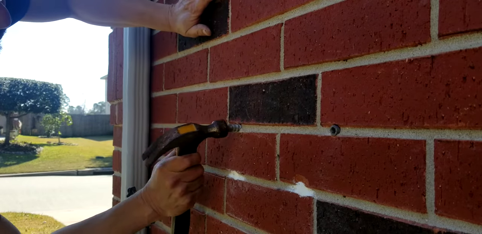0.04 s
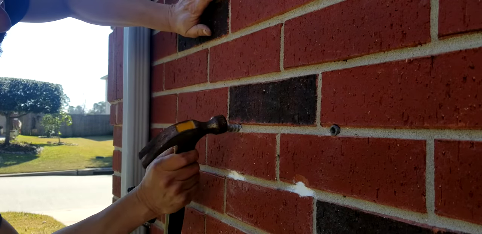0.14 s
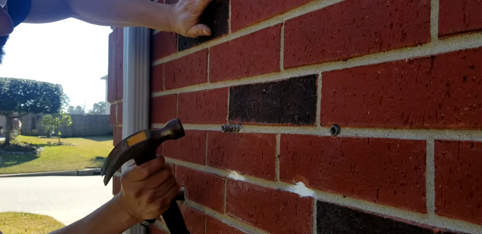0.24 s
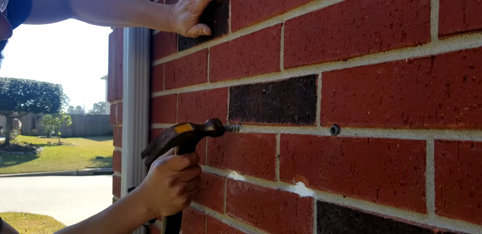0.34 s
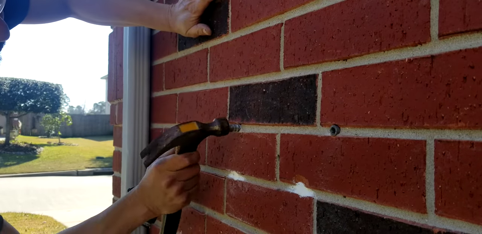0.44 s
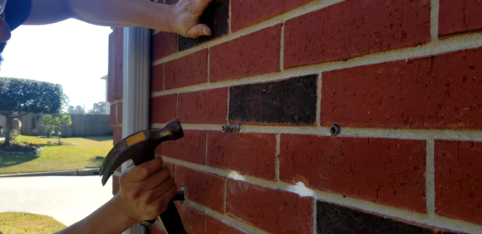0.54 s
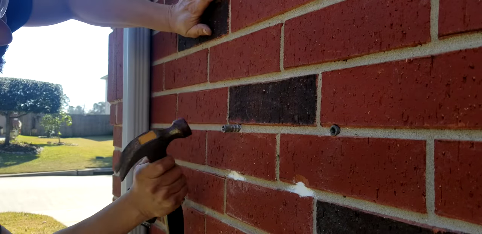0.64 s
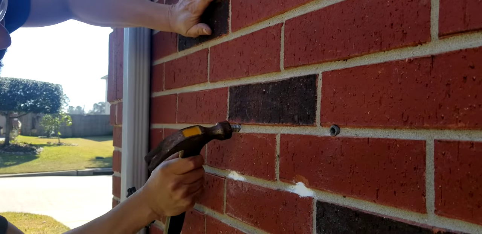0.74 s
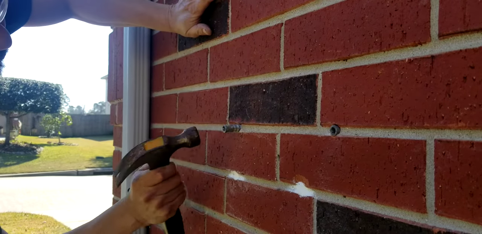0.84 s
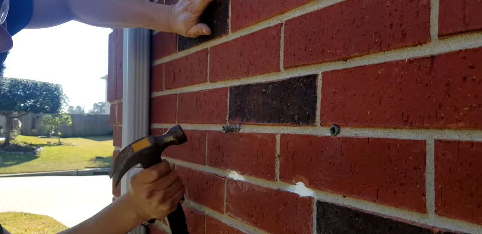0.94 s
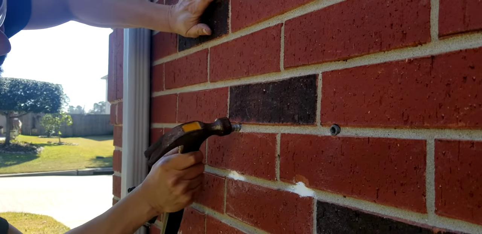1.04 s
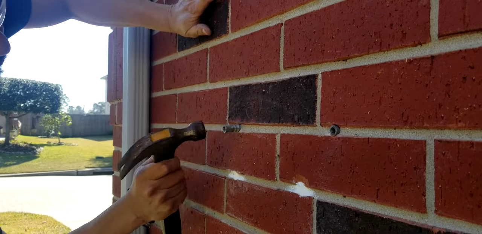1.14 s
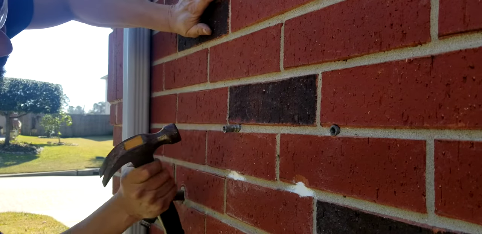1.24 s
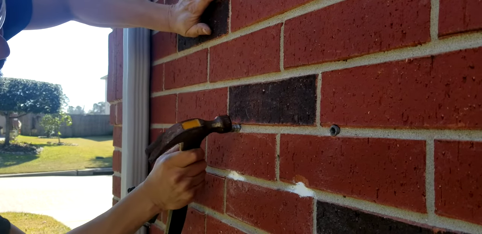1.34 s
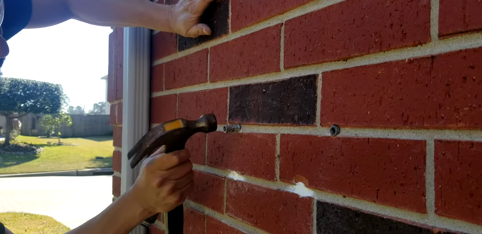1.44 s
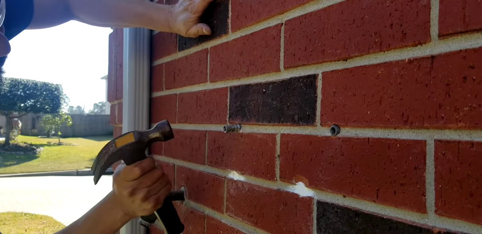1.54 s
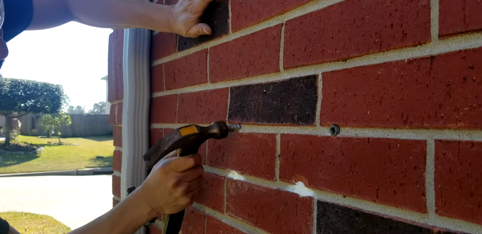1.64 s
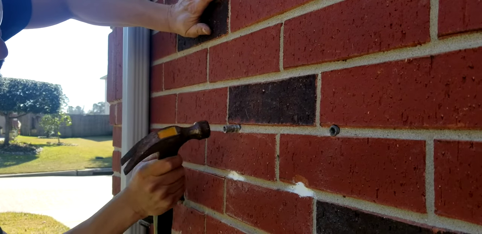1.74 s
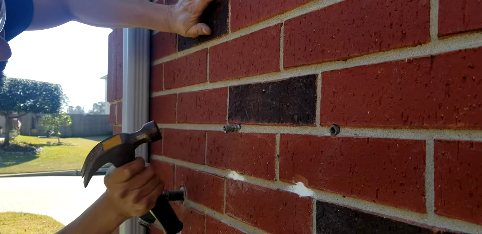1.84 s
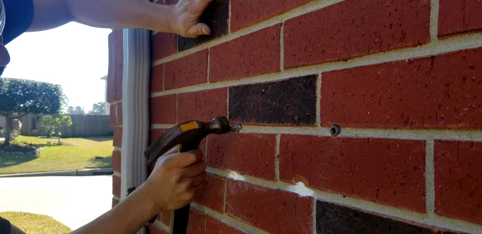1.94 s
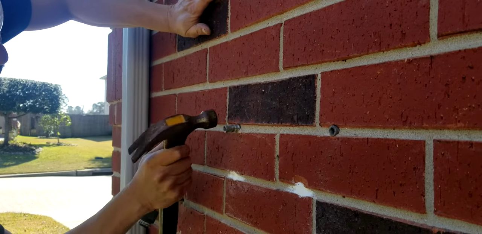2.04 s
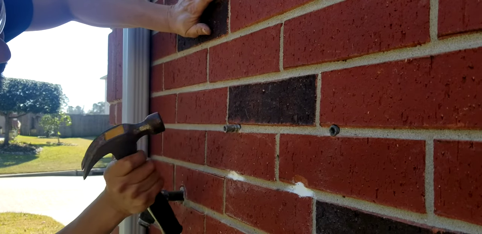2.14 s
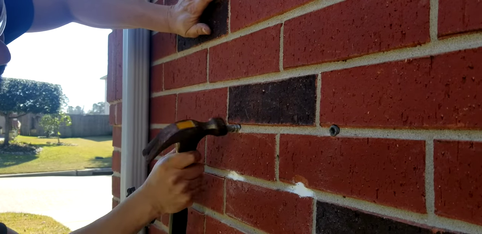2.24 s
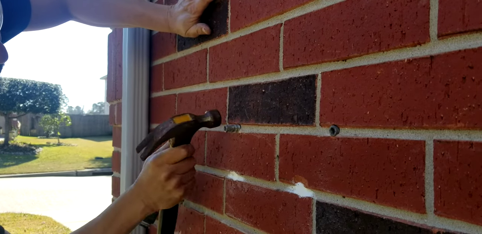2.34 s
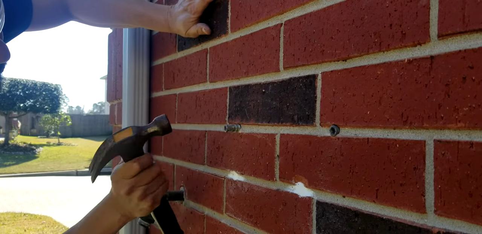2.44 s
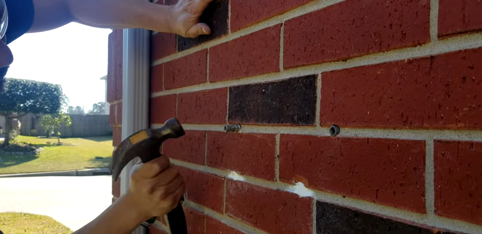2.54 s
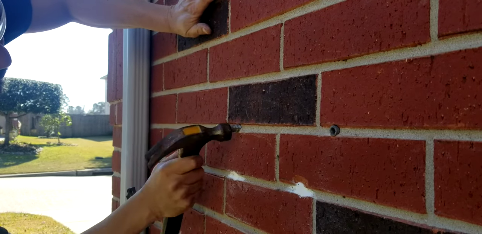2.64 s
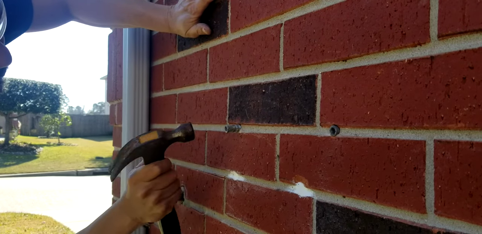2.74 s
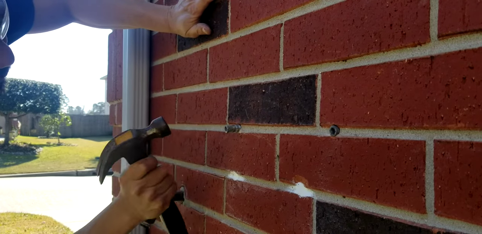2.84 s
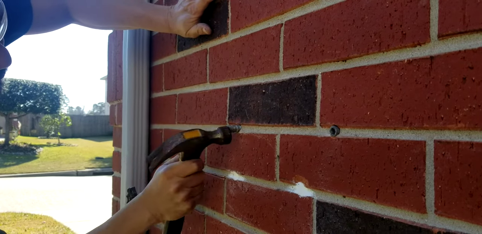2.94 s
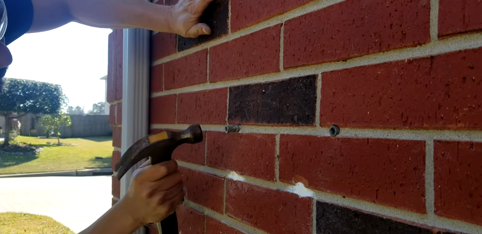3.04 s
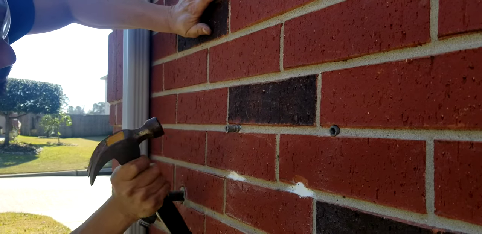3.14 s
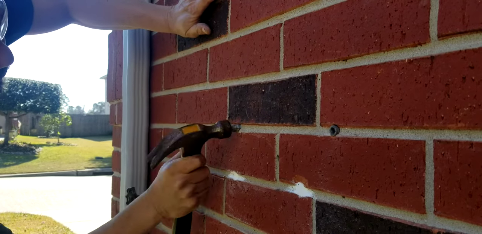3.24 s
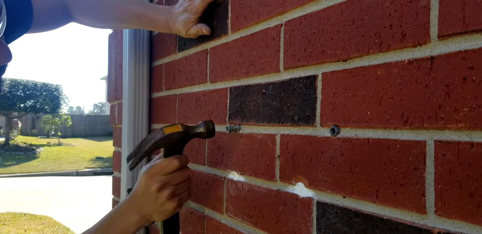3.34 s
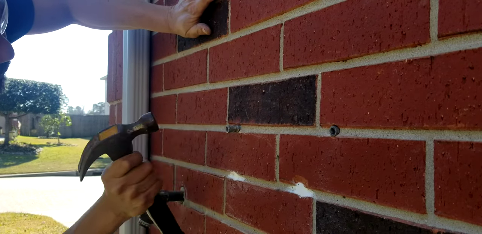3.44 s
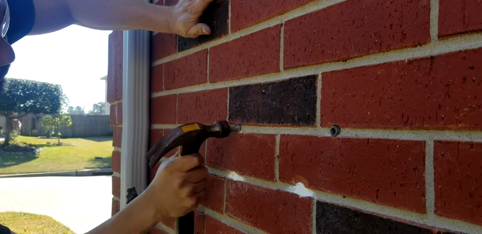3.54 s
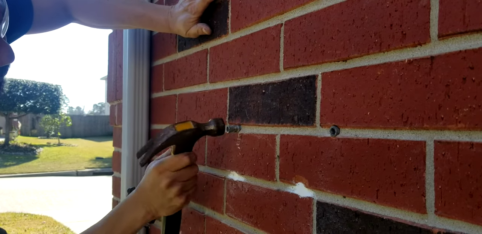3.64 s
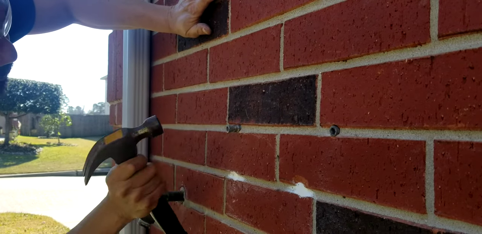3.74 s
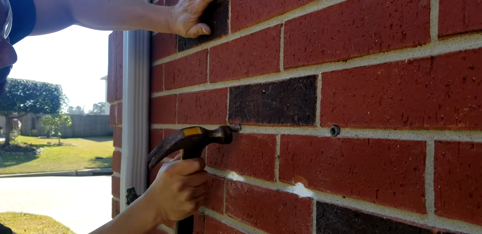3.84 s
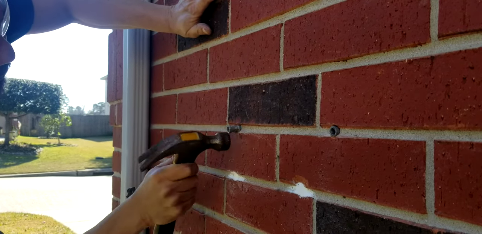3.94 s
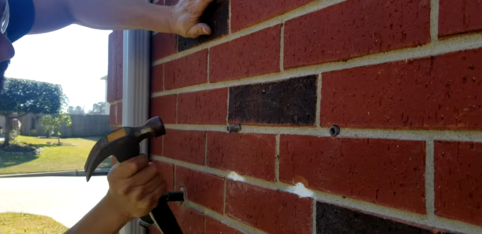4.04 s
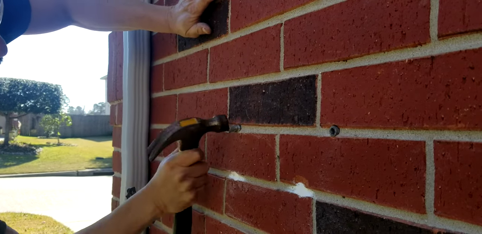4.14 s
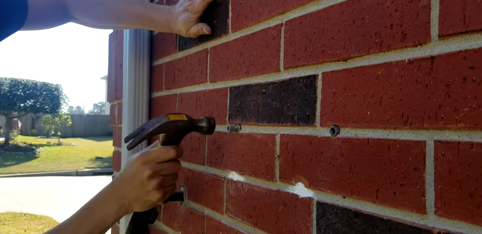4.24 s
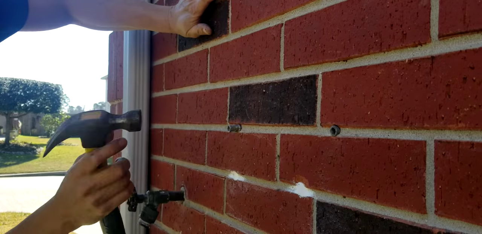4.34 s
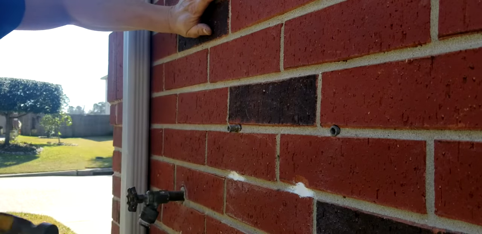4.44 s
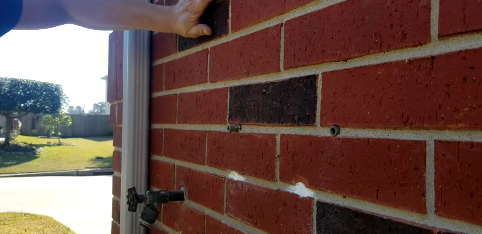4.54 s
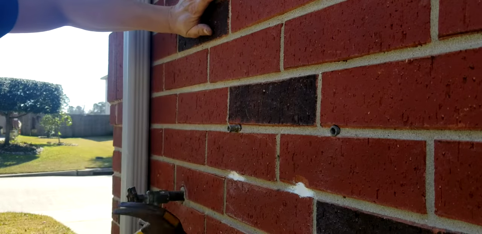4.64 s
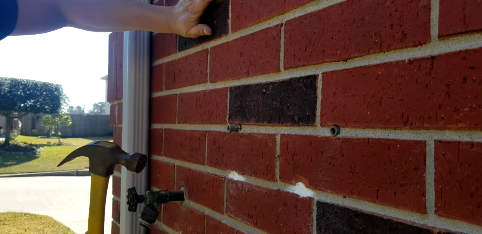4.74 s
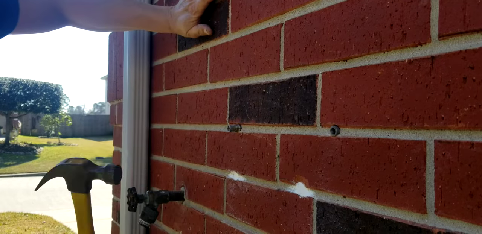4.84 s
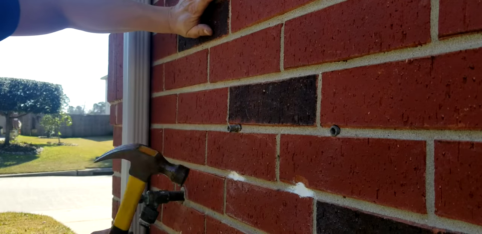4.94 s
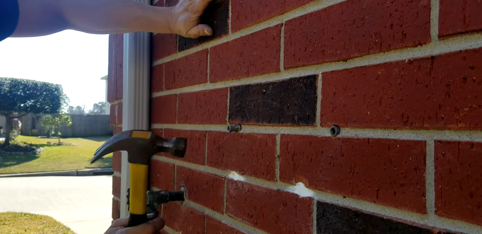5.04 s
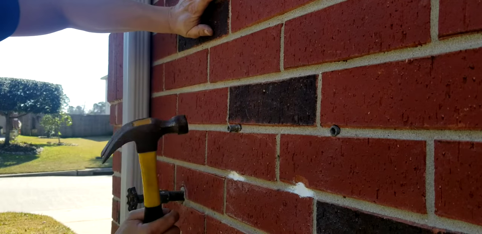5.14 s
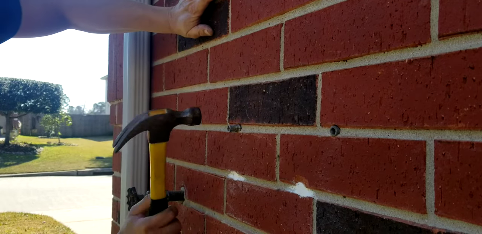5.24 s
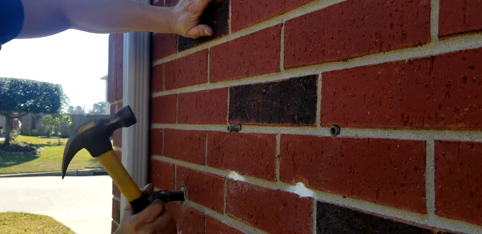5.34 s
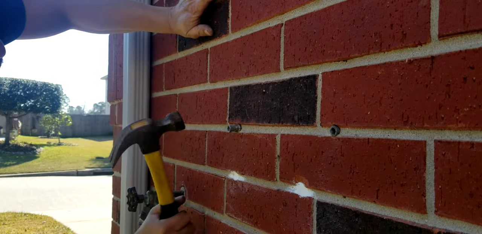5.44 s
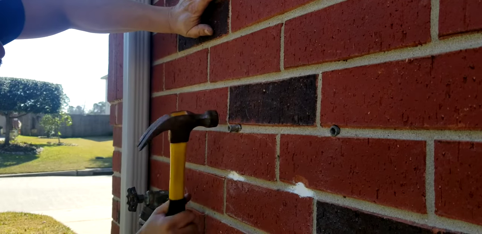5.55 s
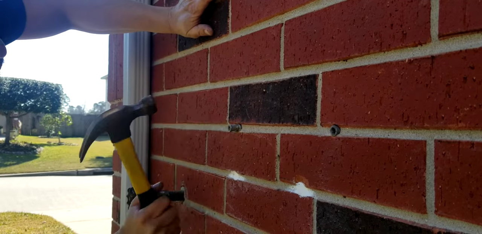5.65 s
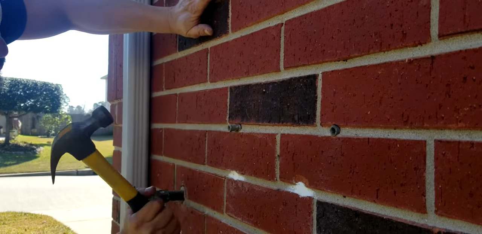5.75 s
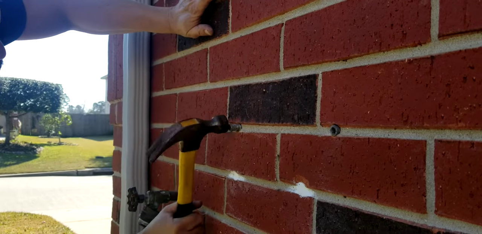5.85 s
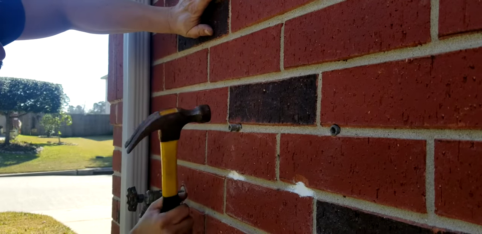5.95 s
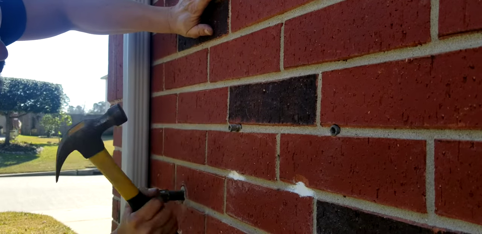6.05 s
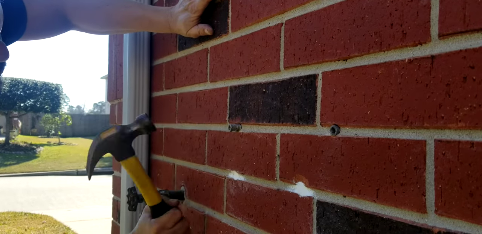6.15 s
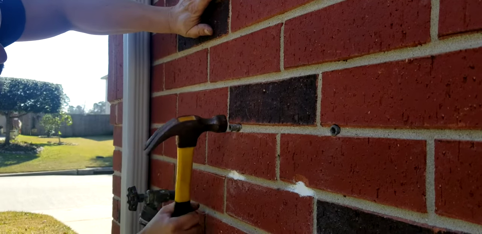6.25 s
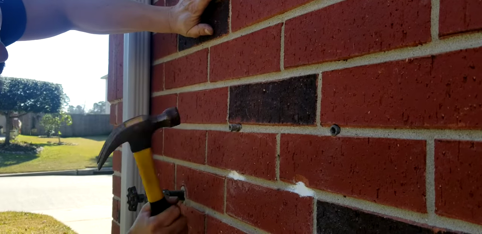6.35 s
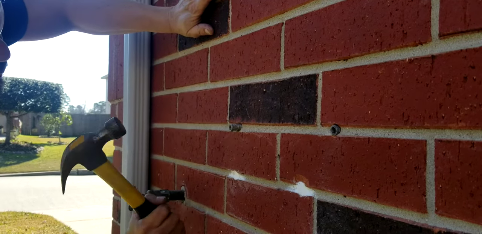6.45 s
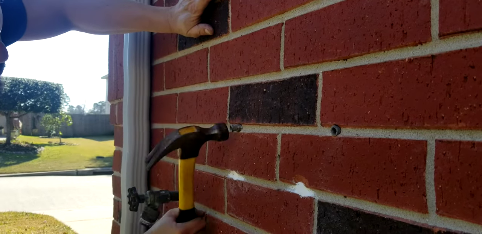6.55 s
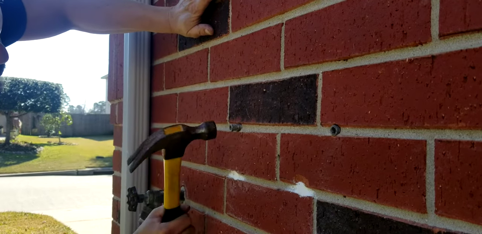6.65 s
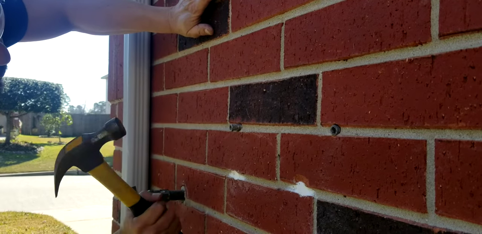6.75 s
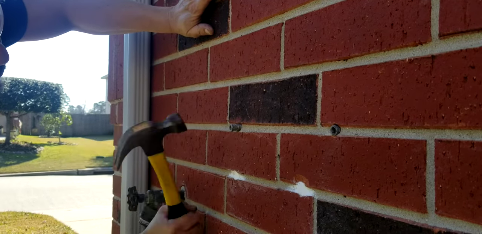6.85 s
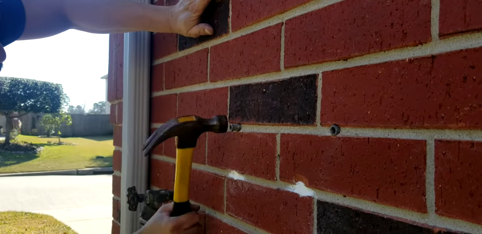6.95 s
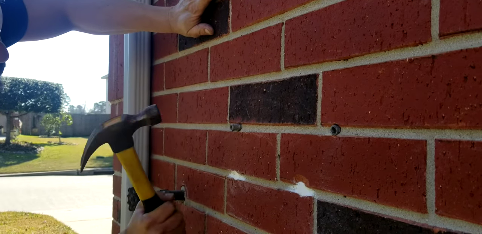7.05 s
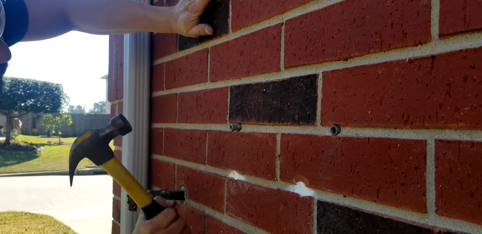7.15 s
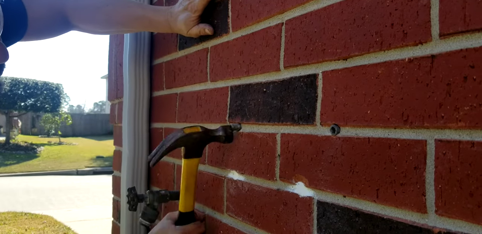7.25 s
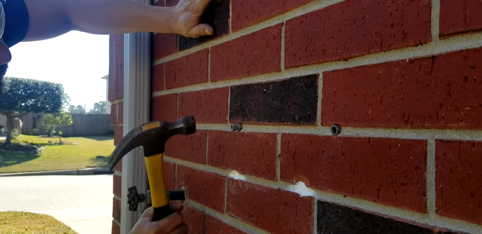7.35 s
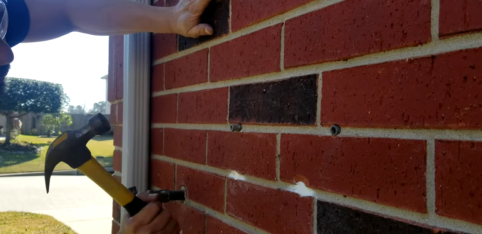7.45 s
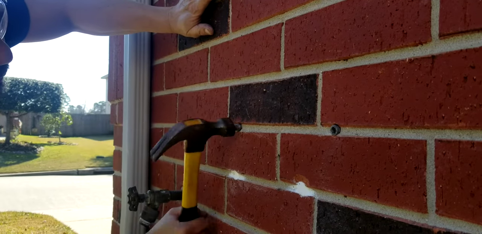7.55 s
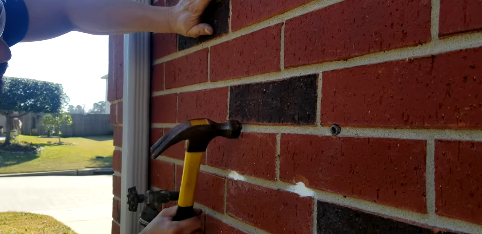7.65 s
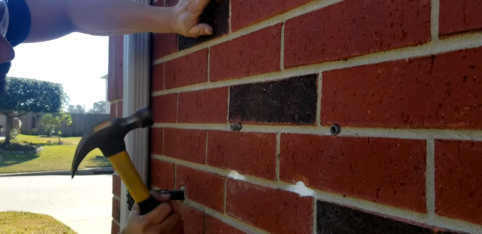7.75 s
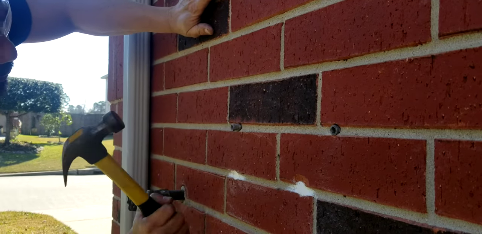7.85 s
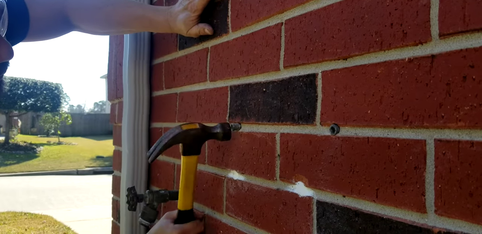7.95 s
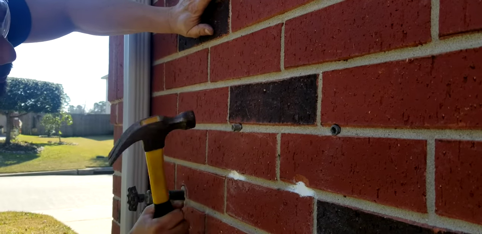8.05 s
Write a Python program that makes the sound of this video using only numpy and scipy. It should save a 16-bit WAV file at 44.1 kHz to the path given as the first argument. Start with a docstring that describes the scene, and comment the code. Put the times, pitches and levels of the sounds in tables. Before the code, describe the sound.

A hammer drives a steel bolt into a brick wall, close by and slightly to the right. Fourteen sharp blows land at about three a second, then come a short pause and eight more, some with light bounces. Each cracks on the steel, knocks dully through the wall and leaves a faint ring. The hits echo briefly around a yard, over the faint rumble of a distant street.

```python
"""A claw hammer drives a steel bolt into the mortar of a brick house wall: 14 blows, a pause, 8 more.
Each blow cracks on the bolt head, makes the wall knock and boom, and leaves a faint ring of steel.
The hits sit close on the right; nearby surfaces slap them back, a flutter runs between facing walls
and a diffuse tail fills the yard. Underneath, a far street rumbles; one faint squeak slips in early."""
import sys
import numpy as np
from scipy import signal
from scipy.fft import rfft, irfft
from scipy.io import wavfile
from scipy.ndimage import uniform_filter1d, minimum_filter1d

SR = 44100
rng = np.random.default_rng(int(sys.argv[2]) if len(sys.argv) > 2 else 0)


def dump(signal):
    """Clip the signal to [-1, 1] and save it as 16-bit WAV at the path in sys.argv[1]."""
    limited = np.clip(np.atleast_2d(signal).T, -1, 1)
    pcm = np.round(limited * 32767).astype(np.int16)
    wavfile.write(sys.argv[1], SR, pcm)


N = 356769
TOP_CUT_HZ = 16100
BAND_EDGES_HZ = 22 * 2 ** np.arange(0, 9.7, 1 / 3)
BAND_CENTRES_HZ = np.sqrt(BAND_EDGES_HZ[1:] * BAND_EDGES_HZ[:-1])


def from_db(db):
    return 10 ** (np.asarray(db) / 20)


def unit_rms(x):
    return x / np.sqrt(np.mean(x ** 2) + 1e-20)


def at_hz(rows, hz):
    """The columns of a table, read on a log-frequency axis."""
    freqs, *columns = np.transpose(rows)
    return [np.interp(np.log(hz), np.log(freqs), c) for c in columns]


def third_octave(x, k):
    return signal.sosfilt(signal.butter(2, BAND_EDGES_HZ[k:k + 2], "band", fs=SR, output="sos"), x)


def low_pass(x, hz):
    pole = np.exp(-2 * np.pi * hz / SR)
    return signal.lfilter([1 - pole], [1, -pole], x + 1e-18)


def decay(t, t60):
    return np.exp(-np.log(1000) * t / t60)


def delayed(x, delay_s):
    lag = int(round(delay_s * SR))
    return np.pad(x, [(0, 0)] * (x.ndim - 1) + [(lag, 0)])[..., :N]


def mix_in(out, at_s, x):
    start = int(round(at_s * SR))
    out[..., start:start + x.shape[-1]] += x[..., :N - start]


def clicks(times, db):
    out = np.zeros(N)
    out[np.round(times * SR).astype(int)] = from_db(db)
    return out


def ring(x, hz, t60):
    """A resonator: a unit click sets a mode of height 1 ringing."""
    r, w = decay(1 / SR, t60), 2 * np.pi * hz / SR
    return signal.lfilter([1, -r * np.cos(w)], [1, -2 * r * np.cos(w), r * r], x + 1e-18)


def lingering(power, t60):
    """Stored energy leaks away by 60 dB in t60."""
    pole = decay(2 / SR, t60)
    return signal.lfilter([1 - pole], [1, -pole], power)


def widen(noises, hz, mono_below_hz):
    """Stereo from three noises: the sides share long waves and differ in short ones."""
    shared = 1 / (1 + (hz / mono_below_hz) ** 2)
    return np.sqrt(shared) * noises[0] + np.sqrt(1 - shared) * noises[1:]


def from_right(x, lead_samples):
    """Sound from the right reaches the left side later."""
    return np.array([delayed(x[0], lead_samples / SR), x[1]])


def sticking_out(t, seating_s=1.2):
    """The bolt's free length shrinks from 1 towards 0 as it is driven in."""
    return np.exp(-t / seating_s)


# EQ curve of the street bed: (frequency [Hz], spectral density [dB])
STREET_EQ = [(25, -17.5), (45, -8), (90, 1), (150, -8), (230, -18.5), (400, -33), (750, -21.5), (1100, -31),
             (2000, -43.5), (4000, -40.5), (6700, -44), (9000, -47.5), (16000, -48)]
def street(level_db=-63, mono_below_hz=700):
    """A steady bed of far rumble, centred in the bass and wide on top."""
    hz = np.maximum(np.arange(N // 2 + 1) * SR / N, 1)
    white = widen(rfft(rng.standard_normal((3, N))), hz, mono_below_hz)
    rumble = irfft(white * from_db(at_hz(STREET_EQ, hz)[0]), N)
    return from_db(level_db) * unit_rms(rumble)


def squeak(at_s=.292, length_s=.074, start_hz=405, rise_hz=50, arch=.8, level_db=-49.5):
    """A brief tone with two overtones; its pitch bends up and starts to fall again."""
    progress = np.clip((np.arange(N) / SR - at_s) / length_s, 0, 1)
    pitch_hz = start_hz + rise_hz * np.sin(np.pi * arch * progress)
    phase = 2 * np.pi * np.cumsum(pitch_hz) / SR
    tone = np.sin(phase) + from_db(-7) * np.sin(2 * phase) + from_db(-18) * np.sin(3 * phase)
    return from_db(level_db) * np.sin(np.pi * progress) * tone


# Scattered sound: (frequency [Hz], near level [dB], near t60 [s], far level [dB], far t60 [s])
YARD_TAILS = [(60, -9, 0.38, -19, 0.97), (92, -8, 0.21, -18.5, 0.95), (170, -10, .3, -17.5, 1),
              (267, -12.5, 0.29, -20, 0.82), (470, -9, 0.057, -35.5, 1), (775, -14.5, 0.17, -14.5, 0.3),
              (1140, -15.5, 0.083, -28, 1), (1610, -7.5, 0.085, -21, 0.5), (1820, -11.5, 0.25, -21, 0.88),
              (2280, -9, 0.15, -19, 0.93), (2740, -14, 0.21, -26.5, 0.27), (4200, -20, 0.42, -24.5, 0.38),
              (6530, -20.5, 0.13, -31, 0.73), (8870, -14, 0.1, -36, 0.53), (15000, -15, 0.27, -38.5, .5)]
def yard_reverb(x, build_s=0.014, mono_below_hz=600):
    """Each band's energy feeds a quick tail off the house front and a faint long one from farther off."""
    white, out = rng.standard_normal((2, 3, N)), 0
    for k in np.flatnonzero(BAND_CENTRES_HZ > YARD_TAILS[0][0] / 2):
        hz = BAND_CENTRES_HZ[k]
        near_db, near_t60, far_db, far_t60 = at_hz(YARD_TAILS, hz)
        send_power = low_pass(third_octave(x[1] + 1e-18, k) ** 2, 1 / (2 * np.pi * build_s))
        near_power = from_db(2 * near_db) * lingering(send_power, near_t60)
        far_power = from_db(2 * far_db) * lingering(send_power, far_t60)
        wash = unit_rms(third_octave(widen(white[k % 2], hz, mono_below_hz), k))
        out = out + np.sqrt(near_power + far_power) * wash
    return out


# Bands of the flutter: (centre [Hz], width [Hz], first return [dB], loss per trip [dB])
FLUTTER_BANDS = [(1764, 200, -27.5, 2), (2140, 260, -22, 3), (3964, 1300, -32, 4), (10100, 6100, -29.5, 11)]
def flutter_echo(x, repeats=14, trip_s=.0461, loose_db=-9):
    """Sound shuttles between two facing walls; the treble goes first and two narrow bands survive."""
    # the send is lower while the bolt sticks out
    send = x[1] * from_db(loose_db * sticking_out(np.arange(N) / SR)) + 1e-18
    trips, response = np.arange(repeats), 0
    for hz, width_hz, first_db, loss_db in FLUTTER_BANDS:
        returns = clicks((trips + 1) * trip_s, first_db - trips * loss_db)[:SR]
        edges = np.clip([hz - width_hz / 2, hz + width_hz / 2], BAND_EDGES_HZ[0], TOP_CUT_HZ)
        band_pass = signal.butter(2, edges, "band", fs=SR, output="sos")
        response = response + signal.sosfilt(band_pass, returns + 1e-18)
    return signal.fftconvolve(send, response)[:N]


# Early reflections: (delay [s], level [dB], low-pass corner [Hz])
REFLECTION_TAPS = [(.004, -5, 2352), (0.016, -5, 1707), (0.1165, -35, 246.4)]
def reflections(x):
    """Ground, eaves and nearby walls each slap back a darker copy."""
    return sum(from_db(db) * delayed(low_pass(x, hz), delay_s) for delay_s, db, hz in REFLECTION_TAPS)


# How the left side is shaded from the bolt: (frequency [Hz], left minus right [dB])
SHADE_BALANCE = [(60, -.5), (160, -2.2), (320, -2.8), (600, .5), (1300, 2.5), (2500, -1.3), (5000, -4.5),
                 (7000, -4.5), (9000, -2), (13000, -2.8)]
def pan(hz):
    """Left and right gain of sound that comes from the bolt."""
    return from_db(at_hz(SHADE_BALANCE, hz)[0] * np.array([[.5], [-.5]]))


# Hammer hits, with a pause for a change of grip:
# (time [s], force [dB], off-centre aim [0-1], tilt of the ping towards the bolt's high mode [dB])
HITS = [(0.0561, -2, 0.7, 4), (0.373, -1, 0.5, 5.5), (0.695, -0.9, 0.4, 7), (1.0041, -2, 0.08, 7.5),
        (1.3166, -1.9, 0.06, 1.5), (1.6364, 0.1, 0.1, 2.5), (1.9404, -1.6, 0, 3.1),
        (2.2714, -2.3, 0.03, -1), (2.5997, -3, 0.92, -16), (2.9135, -2.5, 0.55, 2),
        (3.2276, -0.4, 0.55, 1.5), (3.564, -1.2, 0.0, -15.5), (3.866, -0.8, 0.16, 2.5),
        (4.1453, -1.4, 0.06, -3), (5.4977, 5, 0.4, -6), (5.8547, 2.0, 0.13, 9.5), (6.2135, 1, 0.2, 3),
        (6.55, -0.9, 0, -4.5), (6.8936, -0.2, 0, -4), (7.2279, -1.3, 0.0, -4.7), (7.5729, -1.5, 0.0, -13),
        (7.9286, -2.5, 0.03, 3)]
# Tone of a hit: (frequency [Hz], square on the seated bolt [dB], added when fully off-centre [dB],
# added when the bolt sticks fully out [dB])
HIT_EQ = [(210, -3, 1, 6), (530, -1.92, -1, 5), (970, -0.5, -10.5, -3), (1450, -2, 11.5, 6),
          (2100, 14.5, -9, 1.5), (4500, 5, -1.5, 6), (7000, 6.5, 4.5, 10), (12000, 2.5, 2.5, 9)]
def hit_db(hz):
    """Strength of each hit at one frequency, from its force, its aim and the depth of the bolt."""
    times, force_db, off_centre, _ = np.transpose(HITS)
    square_db, glancing_db, loose_db = at_hz(HIT_EQ, hz)
    return force_db + square_db + glancing_db * off_centre + loose_db * sticking_out(times)


# Modes of the bolt: (frequency [Hz], t60 [s], seated level [dB], added when fully out [dB])
BOLT_MODES = [(5960, .05, -45.5, 9), (6923, .11, -43.5, 14)]
def bolt_ping(level_db=4.5, trace_db=-32, trace_t60_s=.5):
    """The bolt pings, most while it sticks out; each hit favours one mode, and a trace hangs on."""
    times, force_db, _, tilt_db = np.transpose(HITS)
    out = 0
    for (hz, t60, seated_db, loose_db), sign in zip(BOLT_MODES, [-1, 1]):
        mode_db = seated_db + loose_db * sticking_out(times) + sign * tilt_db
        hits = clicks(times, level_db + force_db + mode_db)
        trace = from_db(trace_db) * ring(hits, hz, trace_t60_s)
        out = out + pan(hz) * (ring(hits, hz, t60) + trace)
    return out


# Modes of the steel hammer head: (frequency [Hz], level [dB], t60 [s])
HAMMER_MODES = [(2020, -39, 0.11), (2415, -37, 0.04), (4320, -43.5, .03), (5590, -41.5, 0.02),
                (12600, -44, .025), (11100, -47.5, .025)]
def hammer_clink(level_db=-5.5):
    """The hammer head rings briefly, coloured by each hit."""
    times = np.transpose(HITS)[0]
    return sum(pan(hz) * ring(clicks(times, hit_db(hz) + level_db + db), hz, t60)
               for hz, db, t60 in HAMMER_MODES)


# Light taps of steel on steel, mostly the hammer bouncing back: (time [s], level [dB])
TAPS = [(4.789, -39.5), (5.544, -15), (6.596, -14.5), (6.610, -12), (6.9292, -4), (7.262, -12)]
# Modes of the brick wall: (frequency [Hz], level [dB], t60 [s])
WALL_MODES = [(55, -40, 0.4), (94.4, -24.5, .38), (121, -26.5, 0.18), (171.6, -24.5, 0.19),
              (208.5, -28.5, 0.23), (233.2, -34, .45), (282.6, -7, 0.038), (319, -22, 0.091),
              (351.5, -30, 0.51), (464, -15, 0.032), (479.2, -11, 0.096), (539, -18.5, 0.15),
              (637, -10, 0.088), (748.3, -17, 0.077), (785, -16, .11), (1043, -32.5, 0.033),
              (1136.7, -19, 0.17), (1272, -31, 0.062)]
def wall_knock(level_db=3.5, contact_hz=1270, scatter_db=0.78,
               tap_trim_db=-8, tap_low_cut_hz=600, tap_gate_db=-30):
    """The body: the bolt's shove lasts a moment, so only low modes answer. Bounces knock without boom."""
    times, out = np.transpose(HITS)[0], 0
    tap_times, tap_db = np.transpose([(at_s, db) for at_s, db in TAPS if db > tap_gate_db])
    for hz, db, t60 in WALL_MODES:
        force_db = hit_db(hz) + scatter_db * rng.standard_normal(len(times))
        hits = clicks(times, force_db + db)
        bounces = clicks(tap_times, tap_db + tap_trim_db + db) / (1 + (tap_low_cut_hz / hz) ** 2)
        out = out + pan(hz) * ring(hits + bounces, hz, t60)
    return -from_db(level_db) * low_pass(low_pass(out, contact_hz), contact_hz)


# EQ curve of steel impact and crushed mortar: (frequency [Hz], spectral density [dB])
CRACK_EQ = [(500, 15), (900, 15), (1300, 7), (1700, 9), (2300, 5), (2800, -1.5), (4000, 4.5), (5500, 5),
            (6800, 5), (8300, -14.5), (11500, 8), (14000, -3), (16000, -30)]
def impact_crack(level_db=-23, attack_s=0.00046, snap_t60_s=0.02, grind_db=-12, grind_t60_s=0.043,
                 grit_db=4.0, mono_below_hz=1300, tap_low_cut_hz=500):
    """The transient: a sharp snap at contact, then a short gritty grind as the bolt slips in the mortar."""
    t = np.arange(int(.15 * SR)) / SR
    attack = 1 - np.exp(-t / attack_s)
    envelope = attack * (decay(t, snap_t60_s) + from_db(grind_db) * decay(t, grind_t60_s))
    tap_times, tap_db = np.transpose(TAPS)
    times = np.concatenate([np.transpose(HITS)[0], tap_times])
    roughness = unit_rms(uniform_filter1d(rng.standard_normal((len(times), len(t))), size=40))
    bursts = rng.standard_normal((2, 3, len(times), len(t))) * from_db(grit_db * roughness) * envelope
    cracks, out = 0, np.zeros((2, N))
    for k in np.flatnonzero(BAND_CENTRES_HZ > CRACK_EQ[0][0]):
        hz = BAND_CENTRES_HZ[k]
        # a light tap does not move the bolt, so it has no low end
        tap_gains = from_db(tap_db) / (1 + (tap_low_cut_hz / hz) ** 2)
        gains = np.concatenate([from_db(hit_db(hz)), tap_gains]) * from_db(at_hz(CRACK_EQ, hz)[0])
        stereo_bursts = widen(bursts[k % 2], hz, mono_below_hz).swapaxes(0, 1)
        cracks = cracks + gains[:, None, None] * pan(hz) * third_octave(stereo_bursts, k)
    for at_s, crack in zip(times, cracks):
        mix_in(out, at_s, crack)
    return from_db(level_db) * out


def scene(wall_lead_samples=9, steel_lead_samples=14):
    """Close hits on the right feed the echoes and reverb; the ping, squeak and street bypass them."""
    body = from_right(wall_knock(), wall_lead_samples)
    bite = from_right(hammer_clink() + impact_crack(), steel_lead_samples)
    ping = from_right(bolt_ping(), steel_lead_samples)
    direct = body + bite
    space = reflections(direct) + flutter_echo(direct) + yard_reverb(direct)
    return direct + ping + space + squeak() + street()


def record(dry, low_cut_hz=42, threshold_db=-.6, release_db_per_s=420):
    """Master chain: a low cut, a fast limiter that holds down the transients, then a steep top cut."""
    trimmed = signal.sosfilt(signal.butter(2, low_cut_hz, "high", fs=SR, output="sos"), dry)
    peak_db = 20 * np.log10(np.abs(trimmed).max(axis=0) + 1e-9)
    over_db = np.maximum(peak_db - threshold_db, 0)
    release_db = release_db_per_s * np.arange(N) / SR
    reduction_db = np.maximum.accumulate(over_db + release_db) - release_db
    gain_db = uniform_filter1d(minimum_filter1d(-reduction_db, size=65), size=65)   # smooth look-ahead
    top_cut = signal.ellip(10, .1, 80, TOP_CUT_HZ, fs=SR, output="sos")
    return signal.sosfilt(top_cut, trimmed * from_db(gain_db))


dry = scene()
out = record(dry)
dump(out)
```